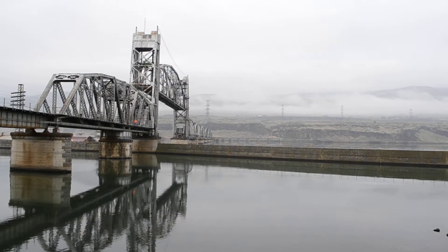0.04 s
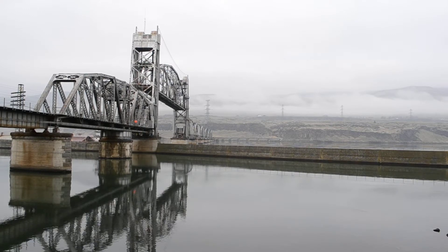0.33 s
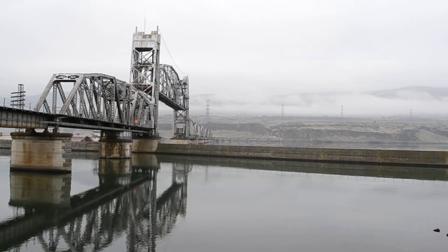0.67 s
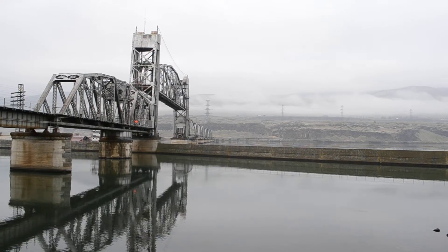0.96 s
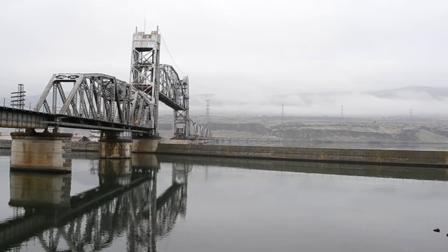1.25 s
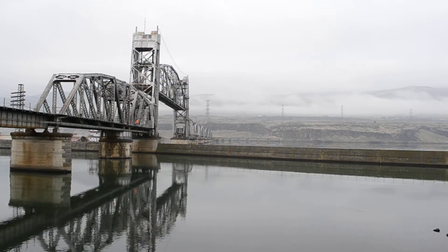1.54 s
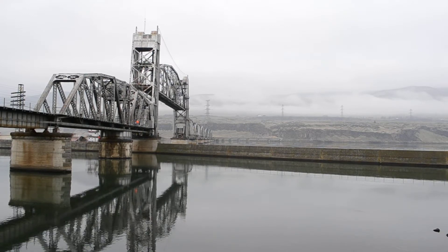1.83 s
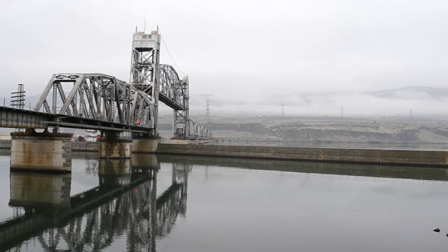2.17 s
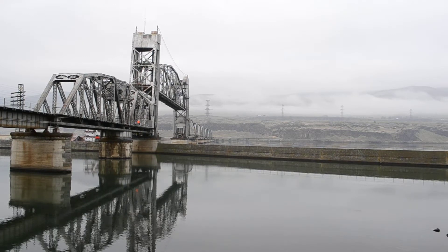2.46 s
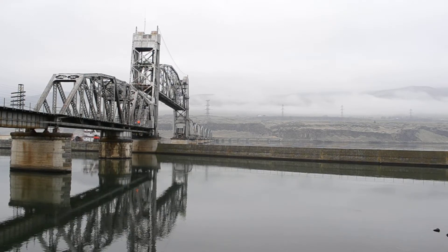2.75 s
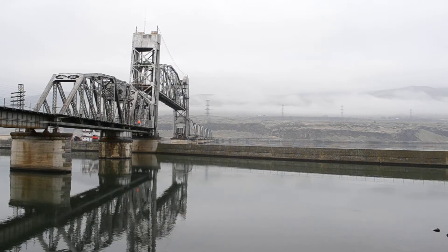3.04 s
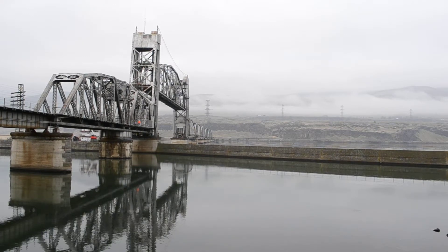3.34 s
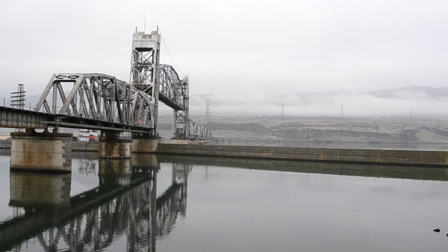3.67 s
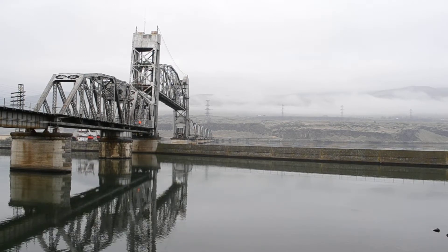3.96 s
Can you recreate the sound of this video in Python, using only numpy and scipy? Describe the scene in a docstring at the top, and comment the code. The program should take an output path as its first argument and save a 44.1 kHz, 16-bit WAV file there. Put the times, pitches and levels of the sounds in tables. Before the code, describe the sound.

Distant road traffic washes steadily across a wide river, over a faint engine drone. One vehicle's low roar recedes from about 1 second. A lorry's brighter tyre noise swells between 2 and 3 seconds and holds to the end, its treads whining in short rising notes. A thin machinery hum comes up at 0.5 seconds, fades just after 2 and returns around 3.

```python
"""A wash of distant road traffic across a wide, calm river. One vehicle's low roar recedes while a lorry's
brighter tyre noise nears, ringing in narrow bands, its treads whining in short rising notes. Far machinery
holds a thin hum with odd harmonics that fades and returns on the air, over a faint low drone."""
import sys
import numpy as np
from scipy import signal
from scipy.fft import rfft, irfft
from scipy.io import wavfile

SR = 44100
rng = np.random.default_rng(int(sys.argv[2]) if len(sys.argv) > 2 else 0)


def to_wav(sig):
    """Store sig (one row per channel, or 1-D mono) as 16-bit WAV at the path in sys.argv[1].

    Samples outside -1..1 are clipped; the rate is SR.
    """
    pcm = np.clip(np.atleast_2d(sig), -1, 1) * 32767
    pcm = np.round(pcm).astype(np.int16)
    wavfile.write(sys.argv[1], SR, pcm.T)  # frames by channels


N = 176400
T = np.arange(N) / SR
FREQS = np.arange(N // 2 + 1) * SR / N


def undb(db):
    """Decibels to gain."""
    return 10 ** (np.asarray(db) / 20)


def unit(x):
    """Scale to rms 1."""
    return x / np.sqrt(np.mean(x ** 2))


def curve(rows):
    """Linear interpolation of (time, value) rows over the scene."""
    times_s, values = np.array(rows).T
    return np.interp(T, times_s, values)


def walk(rate_hz):
    """Smooth random signal, rms 1, rolling off near rate_hz."""
    return unit(irfft(rfft(rng.standard_normal(N)) * np.exp(-(FREQS / rate_hz) ** 2), N))


def roar(shape, flicker_db=0.04):
    """Coloured noise, rms 1; half-octave bands flicker very slightly in the moving air."""
    hz, db = np.array(shape).T
    octave = np.log2(np.maximum(FREQS, 1) / 20)
    gain = undb(np.interp(octave, np.log2(hz / 20), db)) * (octave > 0)
    spectrum = rfft(rng.standard_normal(N)) * gain
    bands = (irfft(spectrum * np.maximum(1 - abs(2 * octave - k), 0), N) for k in range(19))
    return unit(sum(band * undb(flicker_db * walk(5)) for band in bands))


def sing(hz, width_hz):
    """Narrow noise band around hz, rms 1."""
    phase = 2 * np.pi * hz * T
    return unit(walk(width_hz * 1.2) * np.cos(phase) + walk(width_hz * 1.04) * np.sin(phase))


def tone(hz, waver_db=1.0):
    """Sine with a wavering level, rms 1."""
    return unit(np.sin(2 * np.pi * (hz * T + rng.random())) * undb(waver_db * walk(1)))


def traffic():
    """Far traffic merges into a gently swelling wash; hiss comes and goes above it."""
    # wash spectrum (frequency [Hz], relative density [dB])
    wash_shape = [(20, -43.5), (45, -25.5), (90, -14), (160, -9.5), (240, -10), (300, -6), (600, -3),
                  (720, 1), (950, 0), (1200, -3), (1600, -7.5), (2100, -12.5), (2800, -20.5), (4000, -30),
                  (5500, -37.5), (8000, -52.5), (9600, -53.5), (10000, -59), (11000, -64)]
    # slow swell (time [s], gain [dB])
    swell = [(0, -0.5), (.8, 0.5), (1.3, 0), (1.55, 1), (1.9, 0), (2.5, 0), (3.2, -0.5), (3.7, 0.5),
             (4, -0.1)]
    # hiss spectrum (frequency [Hz], relative density [dB])
    hiss_shape = [(800, -26.5), (2000, -1), (2800, 0), (3600, -2), (5000, -22), (8000, -38), (11000, -53)]
    # hiss envelope (time [s], level [dB])
    hiss_level = [(0, -70), (.45, -63), (.7, -58), (1.3, -62.5), (2.1, -73.5), (2.4, -63), (2.7, -67),
                  (3, -59), (3.35, -58), (4, -64)]
    wash = roar(wash_shape) * undb(-39 + curve(swell))
    hiss = roar(hiss_shape) * undb(curve(hiss_level))
    return wash + hiss


def receding_vehicle():
    """A low roar with one brief hollow moan holds, then dies away with distance."""
    # roar spectrum (frequency [Hz], relative density [dB])
    shape = [(60, -14.5), (150, -4), (280, -3.5), (380, 2), (540, 11.5), (680, 5), (1000, 2.5),
             (2000, -39.5), (8000, -76.5)]
    hold_s, fall_db_per_s = 0.78, 5
    moan_at_s, moan_half_width_s = 0.19, 0.12
    leaving = roar(shape) * undb(-44.5 - fall_db_per_s * np.maximum(T - hold_s, 0))
    moan_envelope = undb(-46) * np.exp(-((T - moan_at_s) / moan_half_width_s) ** 2)
    return leaving + sing(hz=526, width_hz=44) * moan_envelope


def lorry_tyres():
    """Tyre rush and ringing bands swell as the lorry nears."""
    # rush spectrum (frequency [Hz], relative density [dB])
    rush_shape = [(500, -17), (900, 1.5), (1150, -1), (1330, -4), (1600, 1.5), (1800, -5.5), (2100, -7.5),
                  (2400, -8), (2750, -9), (3200, -19), (4200, -38), (7000, -54), (11000, -67.5)]
    # tyre resonances (frequency [Hz], width [Hz], level before approach gain [dB])
    resonances = [(783, 25, -57.5), (1172, 28, -52.5), (1390, 16, -58), (1965, 29, -54.5), (2297, 18, -59),
                  (2645, 45, -62.5)]
    # lorry's approach (time [s], gain [dB])
    approach = [(0, -13.5), (1.5, -9), (2.15, -9), (2.85, -0.5), (3.4, -0.5), (4, 1)]
    rush = roar(rush_shape) * undb(-43)
    ringing = sum(sing(hz, width_hz) * undb(db) for hz, width_hz, db in resonances)
    return (rush + ringing) * undb(curve(approach))


def tread_whine():
    """The lorry's treads whine faintly and flare into short, rising notes."""
    # whine flares (centre [s], length [s], centre pitch [Hz], top level [dB])
    flares = [(.74, .16, 740, -48), (1.03, .32, 746, -48), (2.0, .12, 746, -47), (2.135, .07, 778, -46),
              (2.315, .07, 749, -43.5), (2.51, .14, 744, -45.5), (2.895, .14, 782, -42),
              (2.995, .07, 776, -41.5), (3.16, .11, 771, -46.5), (3.44, .11, 784, -47),
              (3.63, .1, 786, -46.5), (3.825, .1, 779, -41.5)]
    rise_hz = 21.8
    whine = sing(hz=746, width_hz=18) * undb(-57.5)
    for centre_s, length_s, hz, db in flares:
        position = np.clip((T - centre_s) / length_s, -.5, .5)
        phase = 2 * np.pi * (np.cumsum(hz + rise_hz * position) / SR + rng.random())
        envelope = np.cos(np.pi * position) * undb(db)
        whine += np.sqrt(2) * np.sin(phase) * envelope
    return whine


def machinery():
    """A fluttering hum fades and returns on the air; its odd overtones slowly grow."""
    # fading of the fundamental (time [s], gain [dB])
    fade = [(0, -18), (.4, -14), (.54, -4), (.76, 1.2), (1.65, 0), (1.85, .8), (2.05, -6), (2.25, -22),
            (2.6, -20), (2.8, -10.5), (3, -5), (3.2, -1), (4, -2)]
    # odd overtones (multiple [-], mid-scene level [dB])
    partials = [(3, -55.5), (5, -69), (9, -86), (11, -89.5)]
    hum_hz, flutter_db, rise_db_per_s = 460.8, 1.1, 1.5
    hum = tone(hum_hz, waver_db=0.8)
    hum *= undb(-44.3 + curve(fade) + flutter_db * walk(rate_hz=20))
    overtones = sum(tone(k * hum_hz) * undb(db) for k, db in partials)
    return hum + overtones * undb(rise_db_per_s * (T - T.mean()))


def machinery_treble():
    """Faint whistles and a thin, growing sizzle far above the hum."""
    # whistles (frequency [Hz], level [dB])
    lines = [(7837, -98), (7897, -99)]
    # sizzle envelope (time [s], level [dB])
    sizzle_level = [(0, -102), (2.3, -100.5), (3.2, -96.5), (3.65, -92.5), (4, -94.5)]
    whistles = sum(tone(hz) * undb(db) for hz, db in lines)
    sizzle = sing(hz=9660, width_hz=75) * undb(curve(sizzle_level))
    return whistles + sizzle


def low_drone():
    """Low steady tones waver and slowly recede."""
    # low tones (frequency [Hz], mid-scene level [dB])
    lines = [(60.2, -66), (110.3, -67), (141, -66), (281, -66)]
    fall_db_per_s = 2.1
    drone = sum(tone(hz) * undb(db) for hz, db in lines)
    return drone * undb(-fall_db_per_s * (T - T.mean()))


def scene():
    """All sources, far off over the water; mono."""
    road = traffic() + receding_vehicle() + lorry_tyres() + tread_whine()
    return (road + machinery() + machinery_treble() + low_drone())[None, :]


def record(dry):
    """Steep elliptic low-pass cuts the top."""
    cutoff_hz = 10800
    return signal.sosfilt(signal.ellip(8, .2, 70, cutoff_hz, fs=SR, output="sos"), dry)


dry = scene()
out = record(dry)
to_wav(out)
```